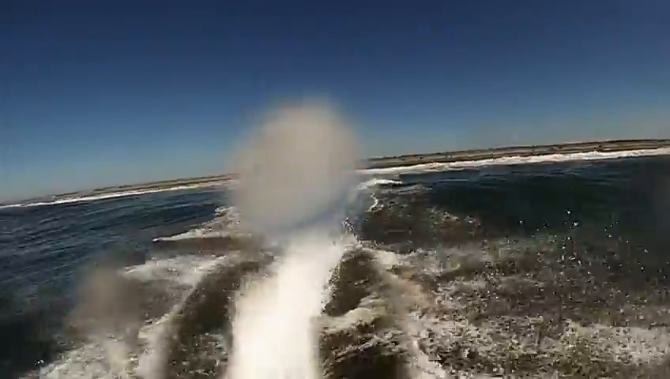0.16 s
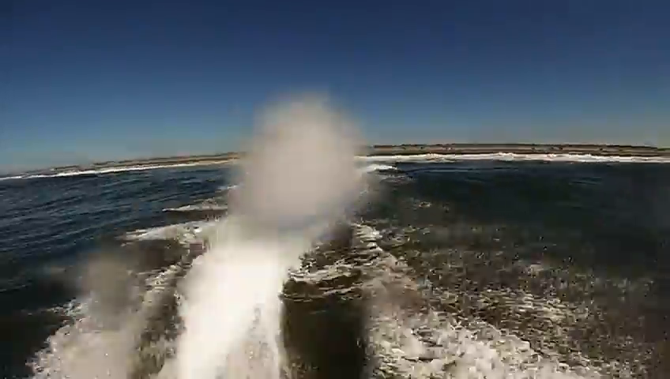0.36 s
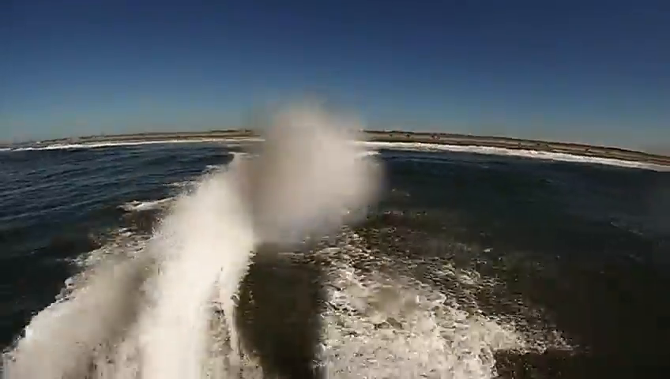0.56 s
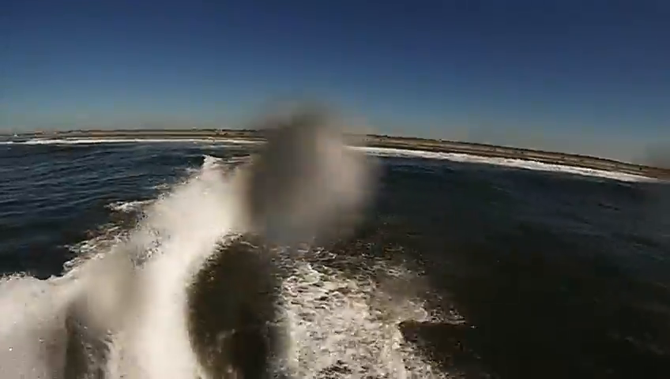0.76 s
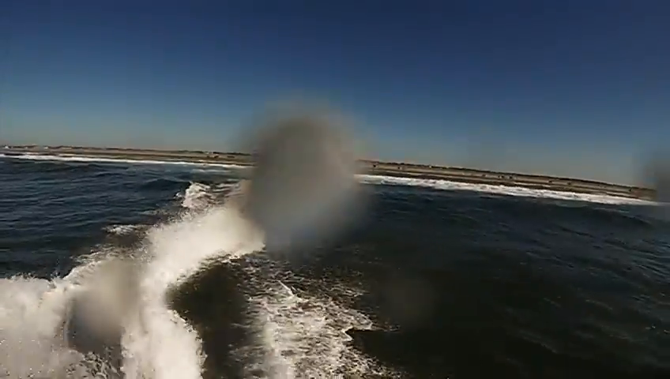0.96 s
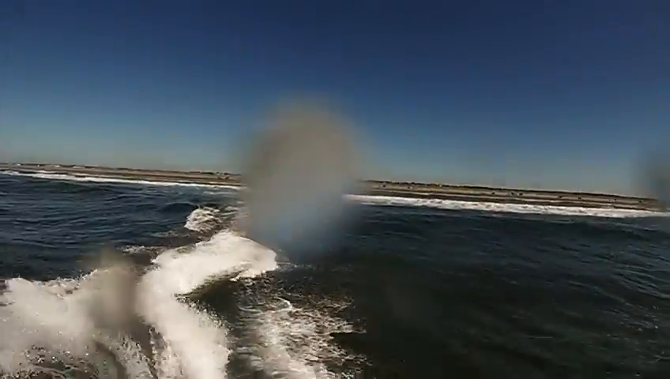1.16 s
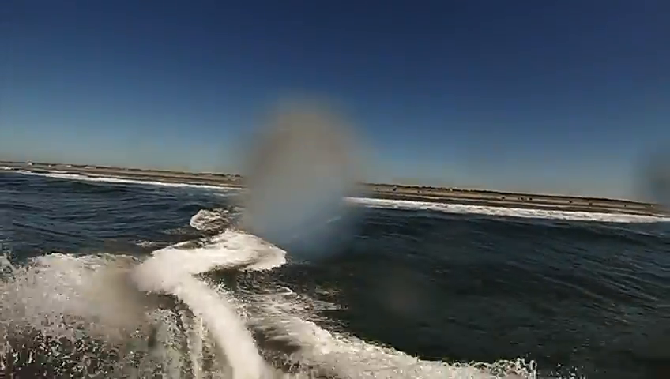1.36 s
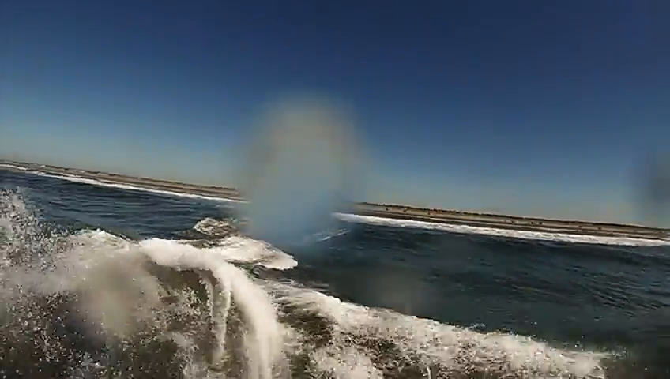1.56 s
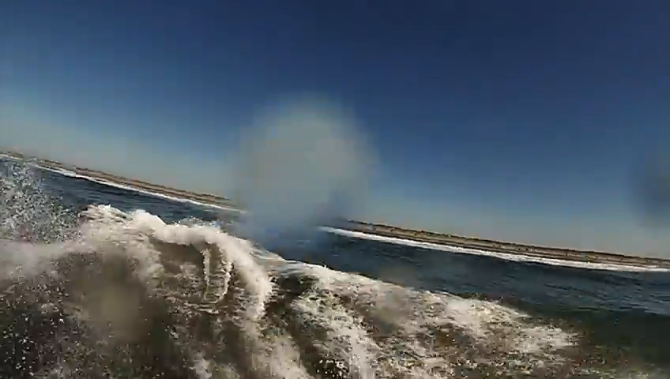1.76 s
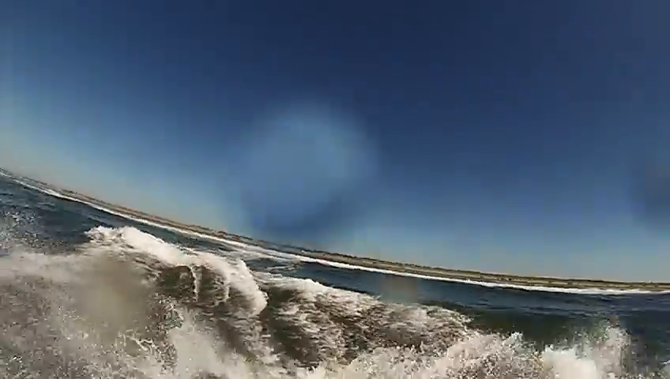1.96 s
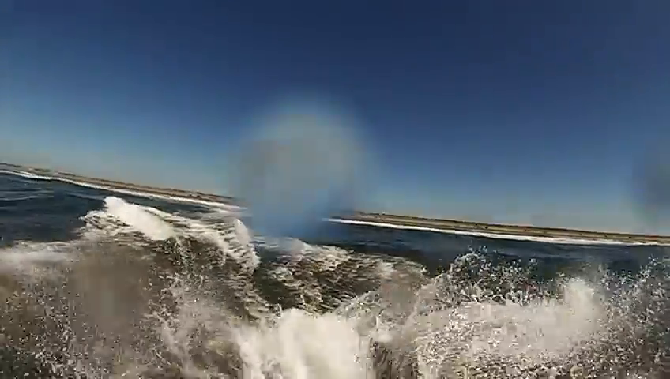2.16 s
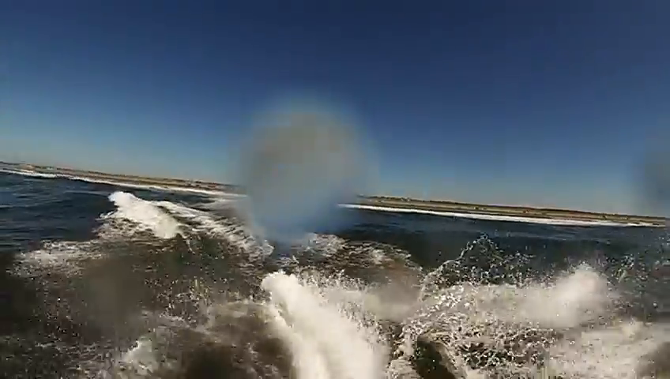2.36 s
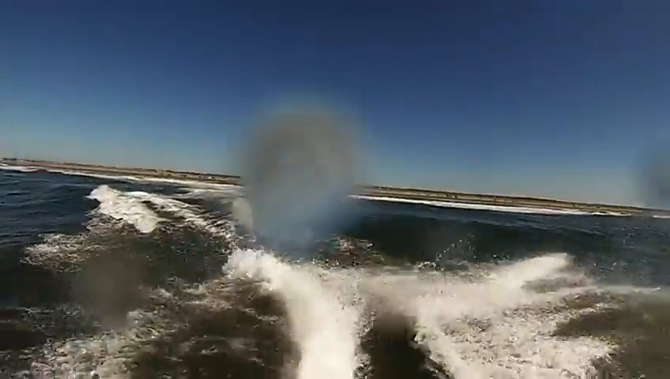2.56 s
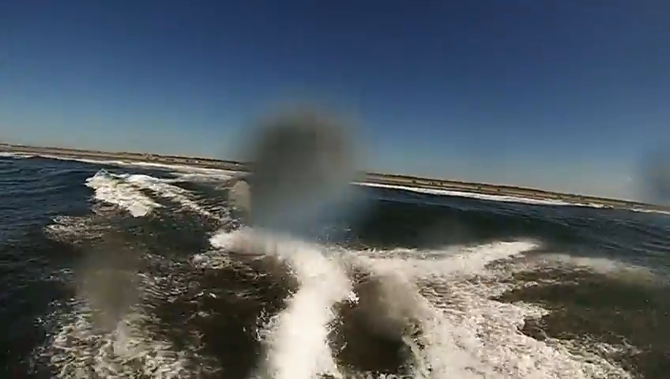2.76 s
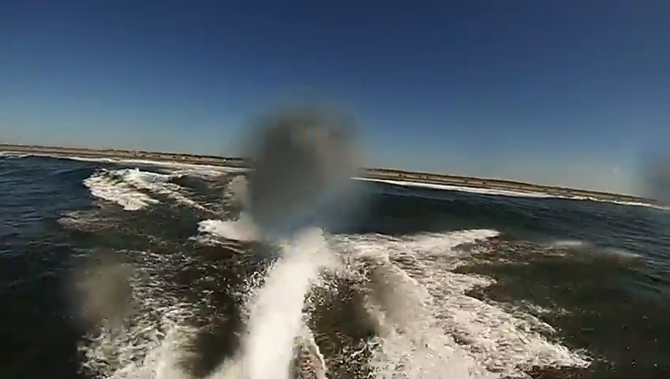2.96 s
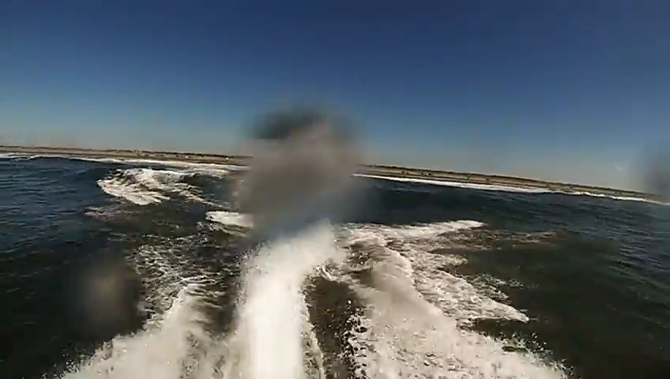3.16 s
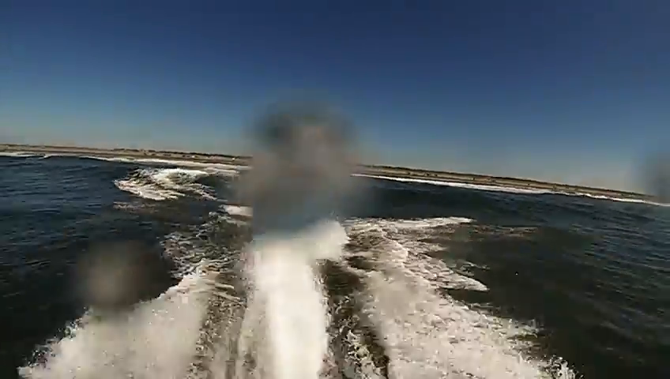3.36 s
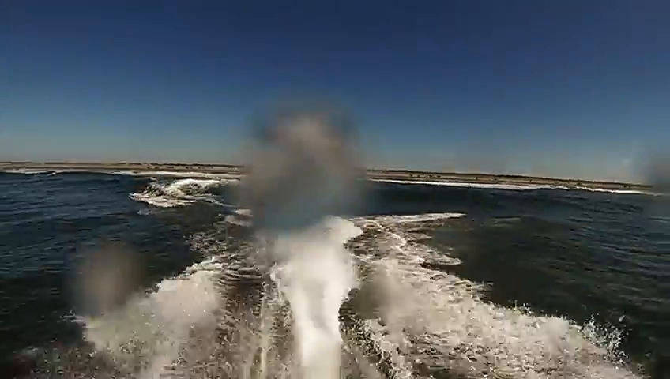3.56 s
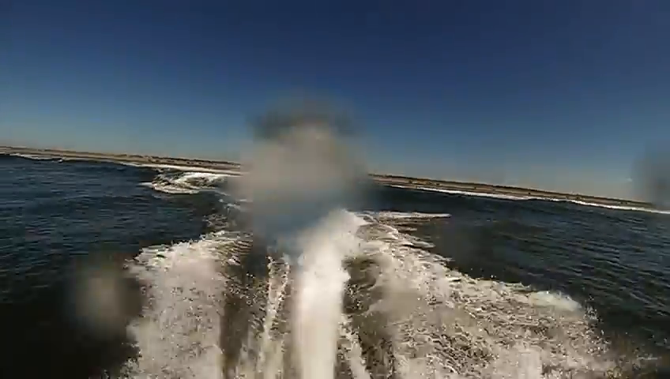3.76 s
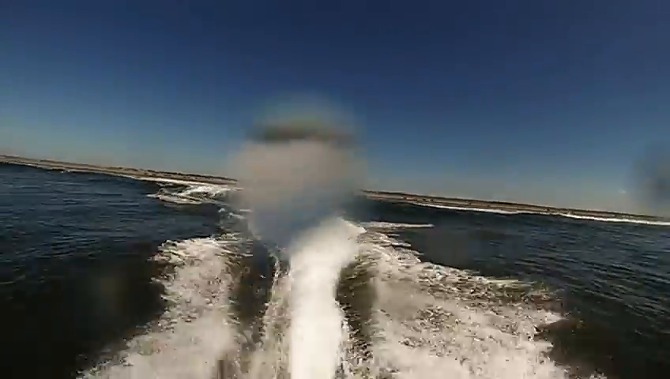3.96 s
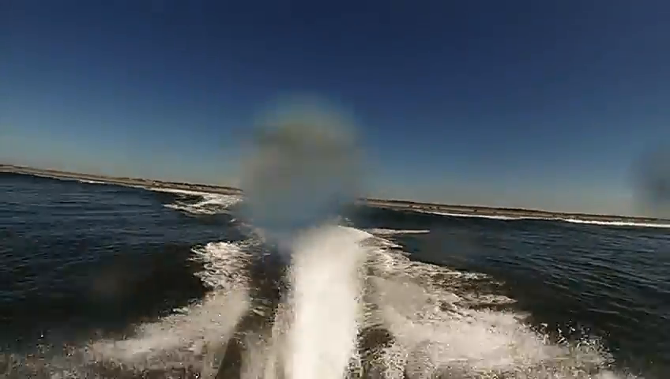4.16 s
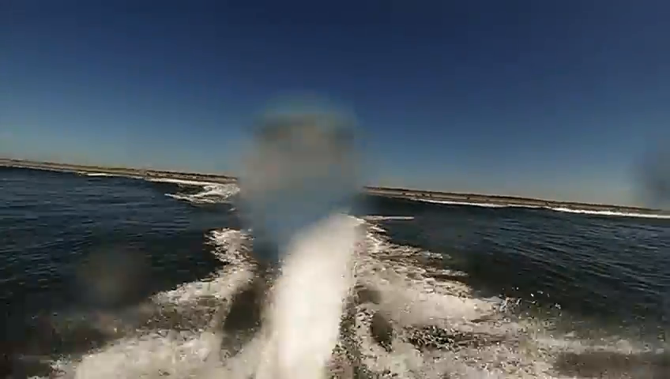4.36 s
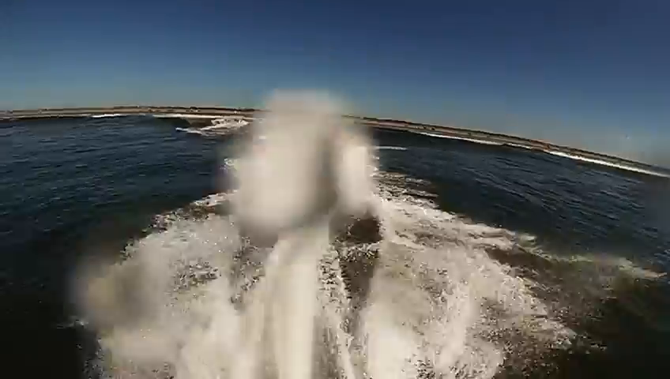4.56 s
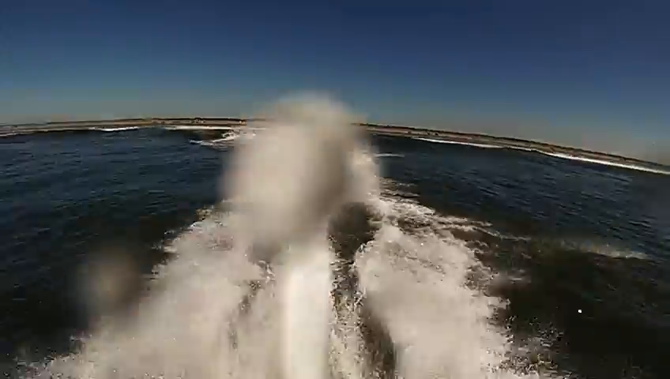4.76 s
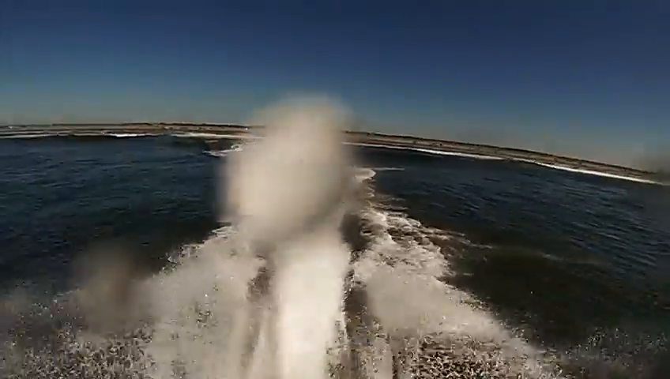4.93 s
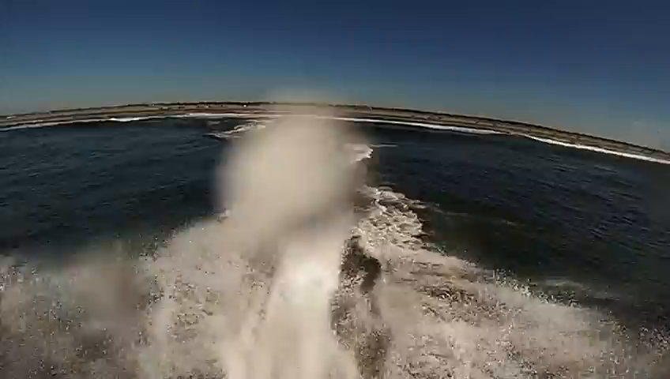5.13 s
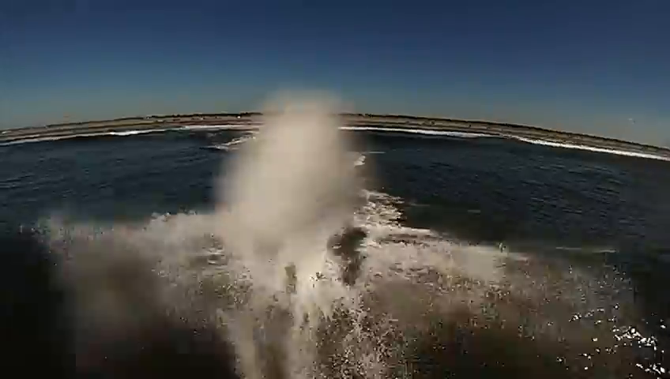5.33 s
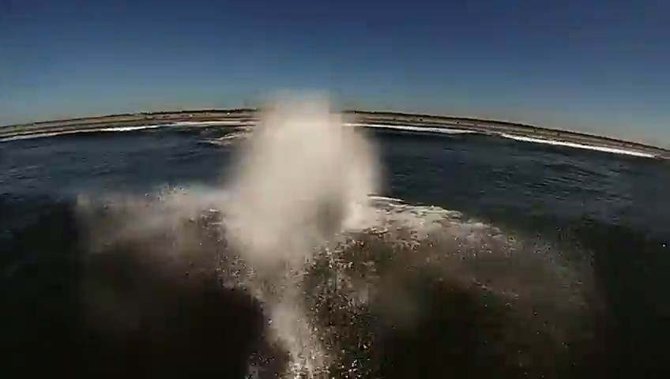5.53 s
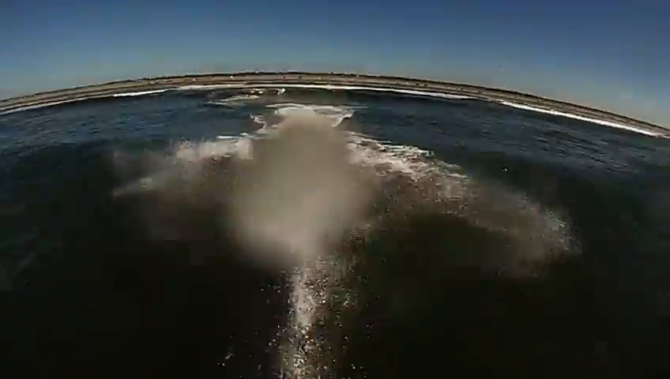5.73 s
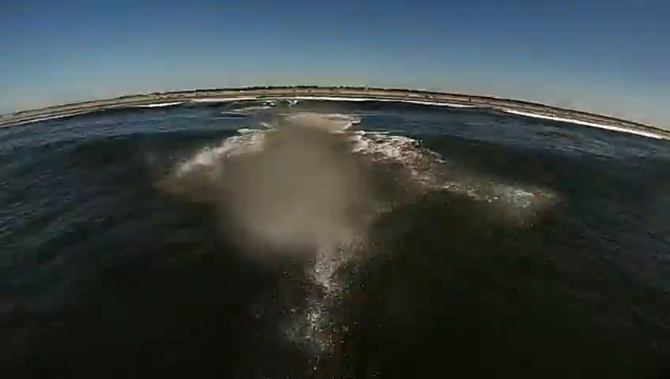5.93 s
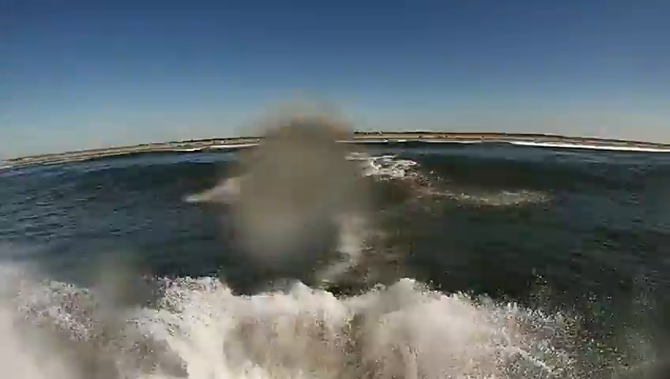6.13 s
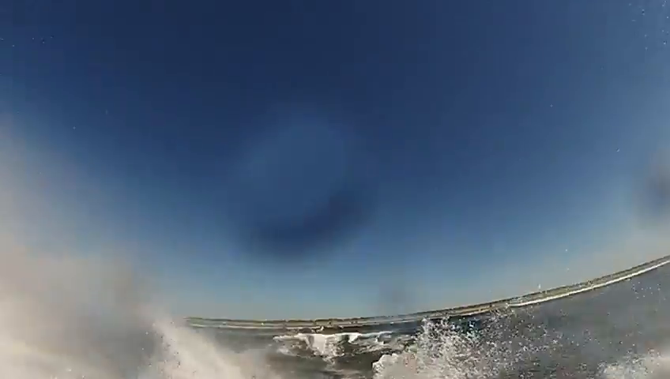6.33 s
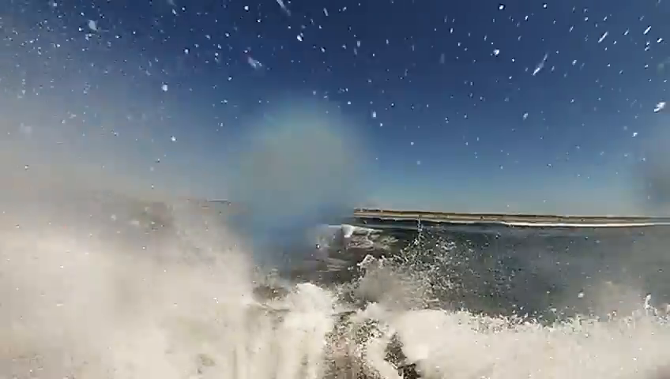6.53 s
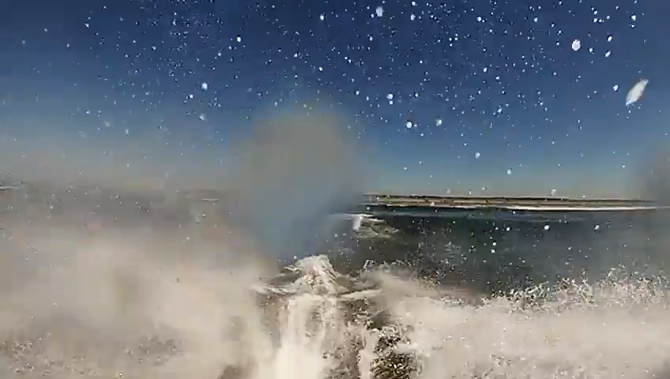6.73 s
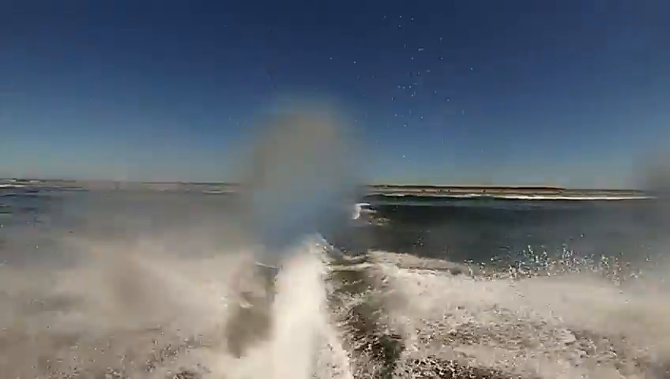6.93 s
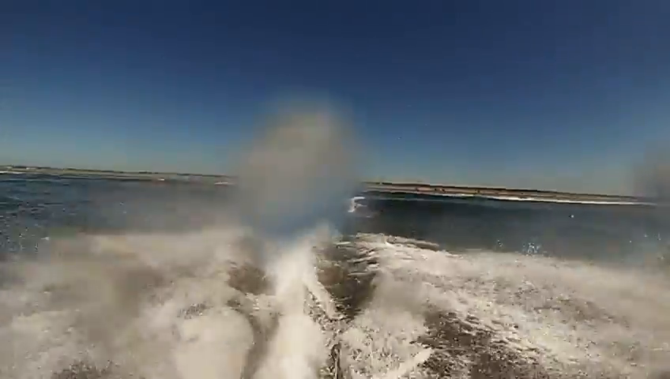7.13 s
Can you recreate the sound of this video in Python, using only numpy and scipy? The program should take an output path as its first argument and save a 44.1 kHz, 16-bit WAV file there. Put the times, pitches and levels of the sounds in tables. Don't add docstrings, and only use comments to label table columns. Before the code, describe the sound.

A low engine drone rises and falls under steady, boxy water rush, close and muffled in a waterproof case. After a short lull the hull lands with a thump and the engine climbs again. Rush and low buffeting grow stronger, the jet's hiss drops away in a jump, then a violent double slam crunches, followed by a dense knocking of drops and a short, dying engine note.

```python
import sys
import numpy as np
from scipy import signal
from scipy.fft import rfft, irfft, next_fast_len
from scipy.io import wavfile
from scipy.ndimage import uniform_filter1d, map_coordinates

SR = 44100
rng = np.random.default_rng(int(sys.argv[2]) if len(sys.argv) > 2 else 0)


def pcm_store(signal):
    levels = np.round(np.clip(np.atleast_2d(signal), -1, 1) * 32767)
    wavfile.write(sys.argv[1], SR, levels.astype(np.int16).T)


def elevation(decibels):
    levels = np.asarray(decibels, float)
    return 10 ** (levels / 20)


N = 317079
T = np.arange(N) / SR

# (time [s], firing rate [Hz], load [dB], rasp of the orders above 2 [dB])
ENGINE_RUNS = [
    [(0, 110.2, -12, -8), (.1, 127.5, -6.5, -6), (.2, 138.4, 1, -1), (.4, 154.8, 0, -6),
     (.5, 150.8, 3.5, -6), (.6, 133.3, 3.5, -8), (.7, 123.3, -8, -6), (.9, 101, -0.5, -5),
     (1.1, 86.8, -12, -6)],
    [(2.02, 90, -16, -4), (2.21, 124, -7, -4), (2.3, 135.7, -2, 2), (2.4, 142.3, 1, 3.5),
     (2.8, 128, -0.5, 4), (3.0, 128.5, -2, -8), (3.4, 138.5, 3, 1), (3.7, 139.7, -0.5, 1),
     (4.12, 163.7, -3, -6)],
    [(4.2, 150.2, -5.5, 3), (4.7, 169.2, -4, -2), (5.3, 166.4, -1.5, -3), (5.75, 158.3, -1, -3)],
    [(6.86, 149.6, -5, 0), (7.1, 148, -14, 0), (7.19, 132, -6, -3)],
]
SPEED_WAVER = [.0056, .004, .014, .01]
ORDERS_DB = [0, 0, -8, -11, -10]
# (frequency [Hz], gain [dB])
HULL = [(80, -30), (130, -39.5), (190, -40.5), (265, -32), (300, -36.5), (340, -40.5), (410, -41),
        (900, -47.5)]

# (frequency [Hz], width [Hz], level [dB])
SPRING_MODES = [(83.64, 13.7, 4.5), (128, 72, -16)]
# (time [s], level [dB])
KICKS = [(.16, -24), (.48, -23.5), (.62, -30), (.88, -31), (1.62, -29), (1.86, -20.5), (2.4, -33),
         (2.8, -33), (3.0, -32), (3.2, -34), (3.34, -23.5), (3.55, -42), (3.8, -25.5), (3.93, -27),
         (4.2, -27), (4.34, -22), (4.66, -18), (4.85, -11.5), (4.95, -22), (5.1, -20), (5.21, -14.5),
         (5.39, -13), (5.5, -19), (5.62, -18), (5.78, -13), (5.9, -19), (6.25, -16.5), (6.37, -15),
         (6.85, -26), (7.11, -25.5)]
# (time [s], level [dB])
SWELLS = [
    (1.04, -34.5),
    (1.98, -26.5),
    (3.54, -36),
    (3.92, -24.5),
    (4.73, -19.5),
    (5.95, -29),
    (6.25, -15),
    (7.19, -22),
]
# (frequency [Hz], density [dB per Hz])
HEAVE_SPECTRUM = [(3, -12), (10, -13), (22, -21.5), (62, -21.5), (95, -39), (150, -120)]
# (frequency [Hz], density [dB per Hz])
CHOP_SPECTRUM = [(60, -45), (130, -1.5), (220, -5.5), (330, -7.5), (480, -19), (700, -20), (1000, -120)]
# (time [s], frequency [Hz], level [dB])
MOUNT_HUM = [(4.2, 173, -42), (4.324, 178, -31), (4.734, 176.2, -38.5), (4.8, 183.2, -38)]

# (time [s], spray level [dB])
FLOW = [(0, -38), (.38, -37), (.9, -40), (1.38, -47), (2.06, -46), (2.44, -38), (2.98, -38.5), (3.4, -36),
        (3.9, -34.5), (4.16, -32), (4.75, -29.5), (5.04, -26), (5.75, -30), (6.17, -32.5), (6.35, -28),
        (6.41, -42), (7.03, -40.5), (7.19, -37)]
# (frequency [Hz], density [dB per Hz])
SPRAY_SPECTRUM = [(260, -36), (450, -3.5), (544, -4.5), (617, -4), (676, -1.5), (753, -0.5), (802, -7),
                  (1100, -1), (1360, -3.5), (1580, 0.5), (1960, -4), (2270, -3), (2890, -10.5),
                  (3200, -17.5), (3900, -12), (5070, -48), (8580, -120)]
# (frequency [Hz], density [dB per Hz])
FIZZ_SPECTRUM = [(3000, -8.5), (4900, -4), (6300, -11), (7200, -12.5), (8100, -14), (8500, -22),
                 (9500, -31), (10500, -120)]
# (frequency [Hz], density [dB per Hz])
MIST_SPECTRUM = [(4940, -35), (8400, -6), (9020, -3), (9870, -0.5), (11100, -0.5), (12100, -8),
                 (15700, -52), (22000, -120)]
# (frequency [Hz], width [Hz], level [dB])
CAVITY_MODES = [(4410, 217, 14), (3280, 310, -12.5)]

# (time [s], peak level [dB], frequency [Hz], t60 [s], direction [1])
SLAMS = [
    (1.824, -1.5, 24.3, 0.3, -1.22),
    (1.821, -7, 265, 0.071, -0.68),
    (1.899, -10.5, 12.4, 0.49, 0.97),
    (6.16, 3.5, 34, 0.087, 0.92),
    (6.274, -5.5, 17.6, 0.56, -0.77),
    (6.328, -3, 59, 0.087, -0.77),
    (6.352, 7.5, 34, 0.05, -1.59),
    (6.378, -15.5, 84, 0.73, 0.57),
]
# (time [s], rms level [dB], t60 [s], tilt [dB per octave], length [s])
CRUNCHES = [
    (1.81, -19, 0.21, -10.5, 0.061),
    (6.139, -12.5, 0.18, -4, 0.031),
    (6.269, -16.5, 0.31, -5.5, 0.11),
    (6.331, -27, 0.16, -5, .035),
    (6.581, -29.5, 3.5, -2, 0.13),
    (6.707, -26, 8.2, -3.5, 0.13),
]
# (time [s], rms level [dB], centre [Hz], width [Hz], length [s])
BURSTS = [
    (6.146, -24, 3600, 1300, 0.011),
    (6.303, -31, 4370, 610, 0.031),
    (1.815, -27, 1120, 900, 0.04),
    (7.03, -40, 470, 74, .06),
    (6.35, -44, 4430, 400, .11),
]
# (time [s], rms level [dB], centre [Hz], width
# [Hz], length [s])
SPITS = [
    (4.9, -53, 9000, 1210, 0.084),
    (4.97, -45, 7900, 895, .1),
    (5.09, -42.5, 8170, 894, 0.056),
    (5.15, -46.5, 8000, 900, 0.099),
    (5.872, -47, 7000, 5000, 0.0058),
    (6.128, -26.5, 2500, 7000, 0.0036),
    (6.826, -31.5, 4500, 5000, 0.0037),
]

# (time [s], peak level [dB], frequency [Hz])
RAPS = [(6.5865, -9, 1250), (6.6232, 1.5, 1100), (6.636, -9, 1350), (6.6463, -8, 1420), (6.6603, -7.5, 680),
        (6.6766, -18, 1460), (6.6924, -17, 1040), (6.7487, -9, 1376), (6.7521, -7, 1280),
        (6.7661, -2.5, 715), (6.7726, -1.5, 1220), (6.7787, -1, 930), (6.7864, -3, 1250),
        (6.7935, -7, 1600), (6.798, -7, 1990), (6.8085, 0, 910), (6.8183, -1, 1050), (6.8274, -9, 2300),
        (6.835, 2.5, 890)]
# (time [s], peak level [dB], frequency [Hz])
TICKS = [(1.9297, -21, 1510), (1.9345, -19.5, 1680), (1.945, -28, 1650), (1.951, -23, 1800),
         (6.2806, -12, 2250), (6.292, -25, 1490), (6.3056, -25, 1850), (6.3361, -8.5, 2200),
         (6.3535, -16, 1870), (6.3576, -28, 1920)]
# (time [s], length [s], mean level [dB])
SHOWERS = [
    (6.58, 0.024, -18.5),
    (6.628, 0.076, -14.5),
    (6.7, 0.049, -18.5),
    (6.753, .065, -16.5),
]

CRUISE_DB = -38
TURN_ENDS_S, STRAIGHTEN_S = 2.62, 0.22
AIRBORNE_S, LIFT_S = (5.76, 6.3), (0.082, 0.14)
# level at cruise [dB], growth [dB per dB of flow], change while carving [dB]
JET, FIZZING, MISTING = (-45, 1.28, -3.5), (-56.5, 0.94, 4), (-70.5, 0.75, 5.3)
CHOPPING, SHAKING, HEAVING = (-40, 0.86, -0.53), (-32.5, 0.8, -1), (-34, 0.36, -0.82)
KICK_RISE_S, KICK_T60_S = 0.066, 0.33
SWELL_RISE_S, SWELL_T60_S = 0.15, 1.12
CRUNCH_RISE_S = 0.012
DRIP_S, DRIP_HZ, DRIP_OCTAVES, DRIP_SPREAD_DB = 0.0036, 1350, 0.35, 3
SPARED_TURN, SPARED_STRAIGHT = 0.44, 0.06


def unit(x):
    return x / np.sqrt(np.mean(x ** 2) + 1e-20)


def curves(rows):
    s, *cols = np.transpose(rows)
    return [np.interp(T, s, c) for c in cols]


def wobble(rate):
    knots = rng.standard_normal(int(N * rate / SR) + 4)
    return map_coordinates(knots, [T * rate])


def filtered(x, response):
    m = next_fast_len(len(x) + 8192)
    return irfft(rfft(x, m) * response(np.fft.rfftfreq(m, 1 / SR)), m)[:len(x)]


def shape(points):
    f, db = np.transpose(points)
    return lambda hz: elevation(np.interp(np.log(hz + 1), np.log(f + 1), db, -120, -120))


def modes(table):
    def response(f):
        total = 0
        for k, (centre, width, db) in enumerate(table):
            damping = 1j * f * width
            total = total + (-1) ** k * elevation(db) * damping / (centre * centre - f * f + damping)
        return total
    return response


def rush(response, patchy_db, flicker_db=0):
    noise = rng.standard_normal(N) * elevation(flicker_db * wobble(250))
    z = signal.stft(noise, nperseg=512)[2]
    field = uniform_filter1d(rng.standard_normal(z.shape), 6, 0)
    field = uniform_filter1d(field, 10, 1)
    patchy = signal.istft(z * elevation(patchy_db * unit(field)), nperseg=512)[1][:N]
    return unit(filtered(patchy, response))


def carving(t):
    return np.clip(1 - (t - TURN_ENDS_S) / STRAIGHTEN_S, 0, 1)


def follows(db, growth, turn_db):
    return db + growth * (curves(FLOW)[0] - CRUISE_DB) + turn_db * carving(T)


def bumps(events, rise, t60, rest_db):
    power = elevation(rest_db) ** 2
    for s, db in events:
        swell = np.where(T < s, np.clip(1 - (s - T) / rise, 0, 1), elevation(-60 * np.abs(T - s) / t60))
        power = power + (elevation(db + 0.5) * swell) ** 2
    return uniform_filter1d(np.sqrt(power), size=900)


def engine():
    out = np.zeros(N)
    for rows, waver in zip(ENGINE_RUNS, SPEED_WAVER):
        hz, load_db, rasp_db = curves(rows)
        hz = uniform_filter1d(hz, size=3000)
        phase = 2 * np.pi * np.cumsum(hz * (1 + waver * wobble(30))) / SR
        tone = np.zeros(N)
        for k, order_db in enumerate(ORDERS_DB, 1):
            waver_db = 1.86 * wobble(25) + (k != 2) * 2.06 * wobble(5)
            level_db = order_db + load_db + (k > 2) * rasp_db + 2.0 + waver_db
            tone += shape(HULL)(k * hz) * elevation(level_db) * np.sin(k * phase)
        start, end = rows[0][0], rows[-1][0]
        out += tone * np.clip(np.minimum(T - start + 0.014, end - T) / 0.081, 0, 1)
    return out


def mount():
    boom = bumps(KICKS, KICK_RISE_S, KICK_T60_S, follows(*SHAKING))
    heave = bumps(SWELLS, SWELL_RISE_S, SWELL_T60_S, follows(*HEAVING))
    spring = np.sin(2 * np.pi * np.cumsum(84 + 3 * wobble(12)) / SR)
    ring = unit(spring * elevation(1.52 * wobble(22)) + 0.57 * rush(modes(SPRING_MODES), patchy_db=1.5))
    chop = elevation(follows(*CHOPPING)) * rush(shape(CHOP_SPECTRUM), patchy_db=2.0, flicker_db=1.5)
    hum_hz, hum_db = curves(MOUNT_HUM)
    hum = elevation(hum_db + 3) * np.sin(2 * np.pi * np.cumsum(hum_hz) / SR)
    hum *= np.interp(T, [4.2, 4.27, 4.72, 4.8], [0, 1, 1, 0])
    return boom * ring + heave * rush(shape(HEAVE_SPECTRUM), patchy_db=0.5) + chop + hum


def water():
    spray_db = curves(FLOW)[0]
    leaving, biting = (T - AIRBORNE_S[0]) / LIFT_S[0], (AIRBORNE_S[1] - T) / LIFT_S[1]
    aloft = np.clip(np.minimum(leaving, biting), 0, 1)
    jet_db = follows(*JET) - 30 * aloft
    surge = wobble(9)
    spray = elevation(spray_db + 0.6 * surge) * rush(shape(SPRAY_SPECTRUM), patchy_db=1.0, flicker_db=-0.5)
    cavity = lambda f: modes(CAVITY_MODES)(f) * modes([(4300, 1500, 0)])(f)
    jet = elevation(jet_db + 1.05 * surge) * rush(cavity, patchy_db=1.0, flicker_db=-0.5)
    bright_modes = modes([(2555, 530, 5.5), (3800, 620, -11.0)])
    bright = elevation(2.17 * spray_db + 23.0) * rush(bright_modes, patchy_db=4.0, flicker_db=1.5)
    fizz_db = follows(*FIZZING) + 3 + 1.1 * wobble(7.4)
    fizz = elevation(fizz_db) * rush(shape(FIZZ_SPECTRUM), patchy_db=0.5, flicker_db=1.0)
    return spray + bright + jet + fizz


def mist():
    return elevation(follows(*MISTING) + 2.5) * rush(shape(MIST_SPECTRUM), patchy_db=2.0)


def landings():
    out, t = np.zeros(N + SR), np.arange(SR // 2) / SR
    for s, db, hz, t60, way in SLAMS:
        swing = np.sin(2 * np.pi * hz * t) * (1 - np.exp(-t / 0.0089))
        out[round(s * SR):][:len(t)] += way * elevation(db + 3.5 - 60 * t / t60) * swing
    for s, db, t60, tilt_db, length in CRUNCHES:
        def shell(f):
            tilt = elevation(tilt_db * np.log2((f + 200) / 1200))
            colour = shape(SPRAY_SPECTRUM)(np.clip(f, 450, 3900)) / (1 + (f / 5500) ** 3)
            return tilt * colour * f / (f + 150)
        lumps = rng.standard_normal(len(t)) * elevation(3.3 * wobble(294.0)[:len(t)])
        swell = np.minimum(t / CRUNCH_RISE_S, 1) ** 2 * np.clip((length - t) / 0.0022, 0, 1)
        out[round(s * SR):][:len(t)] += elevation(db - 60 * t / t60) * swell * unit(filtered(lumps, shell))
    return out[:N]


def bursts():
    out, t = np.zeros(N + SR), np.arange(SR // 4) / SR
    for s, db, hz, width, length in list(BURSTS) + list(SPITS):
        spurt = rng.standard_normal(len(t)) * elevation(2.2 * wobble(220)[:len(t)])
        swell = np.clip(np.minimum(t, length - t) / (0.3 * length), 0, 1)
        cavity = lambda f: modes([(hz, width, 0)])(f) ** 2
        out[round(s * SR):][:len(t)] += elevation(db) * swell * unit(filtered(spurt, cavity))
    return out[:N]


def showers():
    rows = []
    for s, length, db in SHOWERS:
        gap, size, pitch = rng.standard_normal((30, 3)).T
        when = s + np.cumsum(DRIP_S * np.exp(gap / 4)) - DRIP_S
        level_db = db + DRIP_SPREAD_DB * size
        hz = DRIP_HZ * 2 ** (DRIP_OCTAVES * pitch)
        rows += [row for row in zip(when, level_db, hz) if row[0] < s + length]
    return rows


def drops():
    out, t = np.zeros(N + SR), np.arange(SR // 40) / SR
    for s, db, hz in list(RAPS) + list(TICKS) + showers():
        t60 = 0.0022 + 5.9 * min(hz, 1500) / 1500 ** 2
        partner, phase = rng.random(2)
        partner_hz = (1.17 + 1.02 * partner) * hz
        ring = -np.sin(2 * np.pi * hz * t)
        ring += 0.3 * elevation(db / 2.2) * np.sin(2 * np.pi * (partner_hz * t + phase))
        out[round(s * SR):][:len(t)] += elevation(db + 3 - 60 * t / t60) * ring * (1 - np.exp(-t / 0.00025))
    return out[:N]


def scene():
    return (engine() + mount() + water() + mist() + landings() + bursts() + drops())[None]


def roll_off(x):
    return signal.sosfilt(signal.butter(12, 12240, fs=SR, output="sos"), x)


def record(dry):
    x = dry / (1 + np.abs(dry / 1.06) ** 7) ** (1 / 7)
    hz, t, z = signal.stft(x, SR, nperseg=1152)
    high = hz > 8450
    power = np.abs(z[0, high]) ** 2
    usual = uniform_filter1d(power[:120].mean(0), size=9)
    share = SPARED_STRAIGHT + (SPARED_TURN - SPARED_STRAIGHT) * carving(t)
    share = np.clip(share, 0.01, 0.99)
    z[0, high] *= power > -1.2 * np.log(share) * usual
    mix = signal.istft(z, SR, nperseg=1152)[1][:, :N]
    return roll_off(mix)


dry = scene()
out = record(dry)
pcm_store(out)
```